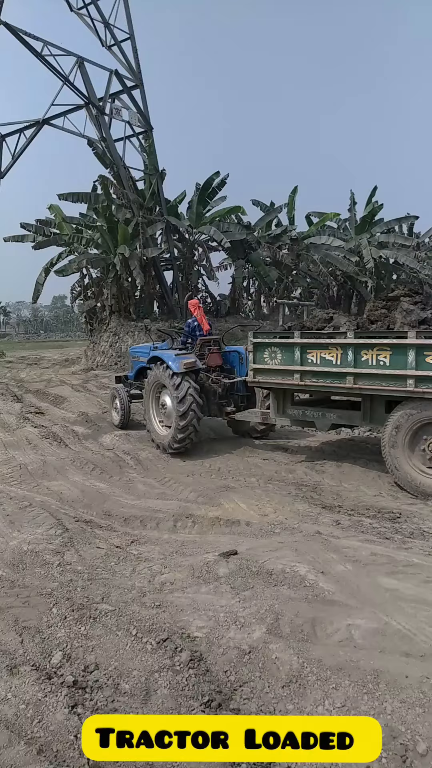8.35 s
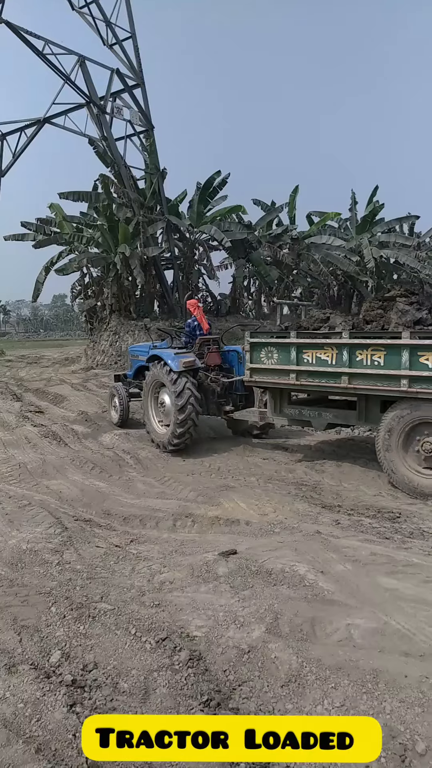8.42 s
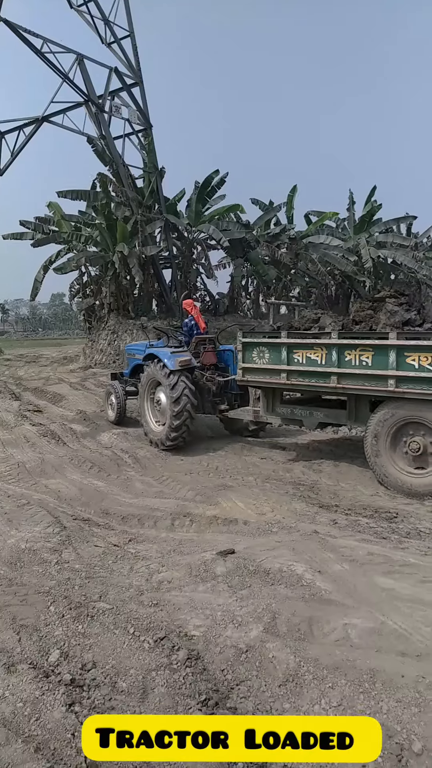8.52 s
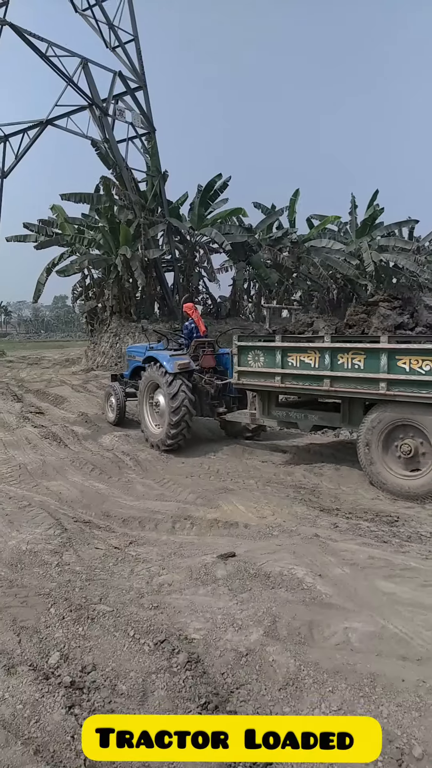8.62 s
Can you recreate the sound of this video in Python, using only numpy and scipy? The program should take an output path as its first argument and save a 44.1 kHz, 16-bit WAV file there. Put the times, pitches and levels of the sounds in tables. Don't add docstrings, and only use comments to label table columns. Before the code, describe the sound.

A loaded tractor starts loud: rough diesel chugging, exhaust bursts, stick-slip creaks from the trailer. Within three seconds the roar sinks into separate hard knocks and metallic rattles, then a pin scrapes and even ticks take over. Several quick bed blows and a broad lurch with steel squeals come around the middle. Afterwards faint ticking, low hum and soft settling thumps remain. Open field, phone microphones at a moderate distance.

```python
import sys
import numpy as np
from scipy import signal
from scipy.fft import rfft, irfft, dct, next_fast_len
from scipy.io import wavfile
from scipy.ndimage import uniform_filter1d, map_coordinates

SR = 44100
rng = np.random.default_rng(int(sys.argv[2]) if len(sys.argv) > 2 else 0)


def decibels_to_gain(level_db):
    exponent = np.asarray(level_db, float) / 20
    return 10 ** exponent


def output_pcm(signal):
    pcm = np.clip(np.atleast_2d(signal).T, -1, 1) * 32767
    wavfile.write(sys.argv[1], SR, np.round(pcm).astype(np.int16))


N = 382347
TIME = np.arange(N) / SR


def unit(x):
    return x / np.sqrt(np.mean(x ** 2) + 1e-20)


def along(points, hz):
    f, v = np.transpose(points)
    return np.interp(np.log(hz + 1), np.log(f + 1), v)


def curves(rows):
    s, *cols = np.transpose(rows)
    return [np.interp(TIME, s, c) for c in cols]


def wobble(rate_hz, size=N):
    knots = rng.standard_normal(int(size * rate_hz / SR) + 4)
    return map_coordinates(knots, [np.arange(size) * rate_hz / SR])


def filtered(x, response):
    m = next_fast_len(N + SR // 2)
    return irfft(rfft(x, m) * response(np.fft.rfftfreq(m, 1 / SR)), m)[..., :N]


def rush(spectrum, patchy_db, size=512):
    hz, _, z = signal.stft(rng.standard_normal((3, N)), SR, nperseg=size)
    field = uniform_filter1d(rng.standard_normal(z.shape[1:]), size=5, axis=0)
    field = uniform_filter1d(field, size=8, axis=1)
    gain = decibels_to_gain(patchy_db * unit(field) + along(spectrum, hz)[:, None])
    return unit(signal.istft(z * gain, nperseg=size)[1][:, :N])


def strikes(events, t60, rise):
    kicks, t = np.zeros(N), TIME[:SR // 4]
    kicks[[round(s * SR) for s, db in events]] = [decibels_to_gain(db) for s, db in events]
    return signal.fftconvolve(kicks, decibels_to_gain(-60 * t / t60) * (1 - np.exp(-t / rise)))[:N]


def rung(events, modes, gain_db, scatter_db, rise):
    out, t = np.zeros(N + SR), TIME[:SR // 4]
    for s, db in events:
        for hz, level_db, t60 in modes:
            luck, tune = rng.standard_normal(2)
            start_db = db + gain_db + level_db + scatter_db * luck
            fade = decibels_to_gain(start_db - 60 * t / t60) * (1 - np.exp(-t / rise))
            out[round(s * SR):][:len(t)] += fade * np.sin(2 * np.pi * hz * (1 + 0.011 * tune) * t)
    return out[:N]


def firings():
    # (time [s], rate [firings/s])
    speed = [(0.0, 24.91), (0.54, 20.17), (1.05, 20.28), (1.5, 15.72), (1.9, 18.43), (2.02, 13.44),
             (2.99, 18.87), (3.53, 18.9), (3.69, 17.68), (4.98, 18.56), (5.14, 15.5), (5.98, 19.37),
             (6.21, 17.13), (6.57, 20.63), (6.9, 17.72), (7.27, 20.26), (7.66, 18.01), (8.67, 19.23)]
    depth, hunt_hz, start_turns = 1.33, 2.079, .0788
    peak_s, span_s = 4.22, 1.1
    swell = np.exp(-.5 * ((TIME - peak_s) / span_s) ** 2)
    hunt = depth * swell * np.sin(2 * np.pi * (start_turns + hunt_hz * TIME))
    turns = np.cumsum(curves(speed)[0] + hunt) / SR - 1.02
    return np.interp(np.arange(int(turns[-1])), turns, TIME)


def valve_ticks(tick_db):
    # (time [s], peak [dB])
    knocks = [(0.1221, -25), (0.2079, -23), (0.534, -17), (0.5716, -17), (0.88, -22), (0.9287, -18),
              (1.4004, -16), (1.713, -20), (1.766, -14.5), (1.995, -19.5), (2.0832, -22), (2.4197, -16),
              (2.7617, -8), (2.8416, -20.5), (2.937, -19), (3.0927, -17), (3.4153, -19), (5.183, -25),
              (5.236, -14), (5.293, -14.5), (5.436, -37)]
    # (time [s], peak [dB])
    clear_ticks = [(3.4713, -30), (3.5167, -33), (3.5691, -26), (3.6244, -36), (3.6828, -31),
                   (3.7412, -33.5), (3.803, -26.5), (3.859, -26.5), (3.916, -22.5), (3.9682, -27),
                   (4.0195, -35), (4.0749, -32), (4.135, -26), (4.193, -26.5), (4.2485, -21.5),
                   (4.302, -24.5), (4.351, -30), (4.405, -31), (4.4575, -35), (4.5125, -34),
                   (4.5703, -28.5), (4.631, -27), (4.6885, -31), (4.7444, -25), (4.7998, -24),
                   (4.853, -23.5), (5.004, -30), (5.0632, -29.5), (5.126, -26.5),
                   (5.4957, -38), (5.5521, -32), (5.61, -33), (5.6683, -24.5), (5.7253, -25), (5.7831, -31),
                  (5.834, -29.5), (5.8838, -33), (5.9347, -45), (5.9886, -38), (6.041, -30.5),
                  (6.0959, -36), (6.1507, -41), (6.207, -37), (6.271, -35), (6.321, -35), (6.379, -31),
                  (6.4286, -22.5), (6.5768, -41), (6.6207, -38), (6.6795, -43), (6.7324, -44),
                  (6.7818, -43), (6.8367, -35.5), (6.8911, -34), (6.9459, -35), (7.0093, -32.5),
                  (7.056, -36), (7.1096, -43), (7.16, -34), (7.213, -38), (7.3183, -25), (7.4922, -44),
                  (7.568, -45), (7.6229, -42), (7.6783, -45), (7.7401, -58), (7.7945, -35.5), (7.8484, -39),
                  (7.9038, -42), (7.9536, -41), (7.9931, -46)]
    s = firings()
    db = np.interp(s, TIME, tick_db) + 3 * rng.standard_normal(len(s))
    over_hiss_db = 2.5
    clear = [*knocks, *[(at, peak + over_hiss_db) for at, peak in clear_ticks]]
    free = np.abs(s[:, None] - np.transpose(clear)[0]).min(axis=1) > .03
    return [*zip(s[free], db[free]), *clear]


def engine():
    # (time [s], level [dB], load: deepens rumble [dB], valve slack: sharpens ticks [dB])
    work = [(0.0, -24.5, -2.5, -5), (0.43, -29, 1.5, 5), (0.84, -28.5, 1, -4), (1.26, -28.5, 5, 2.5),
            (1.57, -35, 8, 9.5), (1.86, -30.5, -2, -23), (2.15, -40, 5.5, 10), (2.66, -37.5, 7.5, 8.5),
            (3.14, -41, 7, 8), (3.55, -42.5, 10.5, 24), (3.81, -45, 9, 17), (4.68, -46.5, 4.5, 25),
            (5.26, -42, 4.5, 12), (5.48, -44, 0.5, 16), (6.18, -44, 4, 10), (6.72, -47.5, -1, 17),
            (6.92, -45.5, 1, -2.5), (8.67, -46.5, -2, 11)]
    # (frequency [Hz], density [dB/Hz])
    thrum_spectrum = [(15, -76), (25, -54), (48, -31), (102, -1), (150, -1), (200, -2), (260, -5),
                      (440, -120)]
    # (frequency [Hz], density [dB/Hz])
    rumble_spectrum = [(100, -65), (170, -15.5), (275, -1), (312, -3.5), (359, -4.5), (420, -6), (466, -6),
                       (722, -13), (1000, -16), (1300, -27), (2200, -120)]
    # (frequency [Hz], density [dB/Hz])
    block_spectrum = [(350, -23.5), (600, -5), (805, -3), (1030, -10), (1350, 2.5), (1620, -3.5),
                      (2060, -4), (2390, -0.5), (2830, -7.5), (3110, -10.5), (3660, -14), (3800, -17.5),
                      (4940, -69), (8360, -120)]
    # (frequency [Hz], density [dB/Hz])
    clatter_spectrum = [(2060, -59), (3500, -10.5), (3680, -10), (3990, -1), (4290, -2), (6150, -9.5),
                        (6960, -7.5), (7780, -11), (8700, -9), (10300, -14), (12900, -19.5), (15400, -35)]
    block_db, load_db, slack_db = curves(work)
    rumble_db = block_db + load_db
    thrum_db = -23 + 0.59 * rumble_db
    clatter_db = -4 + 0.95 * block_db
    shared = wobble(12)

    thrum = decibels_to_gain(thrum_db + 2.5 + 1.46 * shared) * rush(thrum_spectrum, patchy_db=1, size=2048)

    tick_lag_s, chug_db = .022, 5
    beat = strikes([(max(s - tick_lag_s, 0), 0) for s in firings()], t60=0.093, rise=0.015)
    rumble_gain = decibels_to_gain(rumble_db - 2.0 + chug_db * beat + 1.06 * shared + 1.5 * wobble(30))
    rumble = rumble_gain * rush(rumble_spectrum, patchy_db=1.5, size=1024)

    early = [(max(s - .0015, 0), db) for s, db in valve_ticks(block_db + slack_db)]
    block_gain = decibels_to_gain(block_db + 1.4 * shared) + decibels_to_gain(-9.5) * strikes(early, t60=0.078, rise=0.007)
    block = block_gain * rush(block_spectrum, patchy_db=2.5)

    snap_db = 0
    ticks = strikes(early, t60=.075, rise=.0027) + decibels_to_gain(snap_db) * strikes(early, t60=.022, rise=.0015)
    clatter_gain = decibels_to_gain(clatter_db - 4.5 + 0.6 * shared) + decibels_to_gain(-11.5) * ticks
    clatter = clatter_gain * rush(clatter_spectrum, patchy_db=1.3)
    return thrum + rumble + block + clatter


def exhaust():
    # (time [s], pitch [Hz], level [dB])
    drone_track = [
        (0.0, 115.3, -44),
        (0.56, 103.9, -43.5),
        (1.44, 108, -36.5),
        (1.77, 114.7, -44),
        (2.3, 118.2, -50),
        (2.53, 119, -57),
        (2.7, 115, -49),
    ]
    # (time [s], peak [dB])
    puff_events = [(0.021, -18), (0.063, -21), (0.109, -20), (0.149, -17), (0.192, -25), (0.236, -19),
                   (0.278, -16), (0.322, -23), (0.37, -21), (0.416, -19), (0.465, -20), (0.501, -25),
                   (0.564, -19), (0.612, -22), (0.665, -21), (0.713, -19), (0.761, -21), (0.811, -22),
                   (0.861, -18), (0.911, -21), (0.959, -22), (1.006, -22)]
    # (frequency [Hz], level [dB], t60 [s])
    stack_modes = [(525, 0, .04), (590, -7, .03), (465, -9, .03)]
    hz, db = curves(drone_track)
    turn = 2 * np.pi * np.cumsum(hz + 1.86 * wobble(24.3)) / SR
    drone = decibels_to_gain(db + 9.0 + 1.4 * wobble(7.62)) * np.sin(turn)
    puffs = rung(puff_events, stack_modes, gain_db=8.5, scatter_db=.7, rise=.004)
    return drone * np.clip((2.7 - TIME) / .1, 0, 1) + puffs


def rubbing(rows, sag, overtone_db, flutter_db, flutter_rate, unsteady):
    out = np.zeros(N + SR)
    for s, length_s, start_hz, db in rows:
        n = round(length_s * SR)
        u = np.arange(n) / n
        hz = start_hz * (1 - sag * length_s * u) * (1 + unsteady * wobble(flutter_rate, size=n))
        turn = 2 * np.pi * np.cumsum(hz) / SR
        swell = np.clip(u / 0.085, 0, 1) * np.clip((1 - u) / 0.28, 0, 1)
        swell = swell * decibels_to_gain(db + flutter_db * wobble(flutter_rate, size=n))
        out[round(s * SR):][:n] += swell * (np.sin(turn) + decibels_to_gain(overtone_db) * np.sin(2 * turn))
    return out[:N]


def trailer():
    # (time [s], length [s], pitch [Hz], level [dB])
    groan_tones = [(.04, .15, 335, -30), (.2, .1, 352, -31), (.38, .13, 292, -29), (.52, .14, 286, -27.5),
                   (1.06, .13, 290.5, -25.5), (1.05, .22, 362, -30), (1.06, .13, 472, -33),
                   (1.18, .13, 265, -27.5), (2.49, .11, 255, -29), (1.34, .12, 470, -34),
                   (1.44, .14, 262, -31), (1.66, .22, 262.7, -33), (1.98, .1, 256, -33), (0, .16, 665, -32),
                   (.22, .1, 660, -36), (0, .07, 236, -31), (.3, .1, 372, -31), (1.34, .1, 365, -31),
                   (1.64, .21, 468, -32.5), (1.68, .12, 690, -43), (2.04, .12, 458, -35.5),
                   (2.1, .16, 216, -36)]
    # (time [s], length [s], pitch [Hz], level [dB])
    hum_tones = [
        (5.5, 2.72, 208, -51),
        (7.4, 0.92, 400, -58),
        (6.0, .5, 470, -60),
        (7.9, .77, 104, -59),
        (5.5, .8, 112, -65),
        (5.7, 1.1, 1500, -63),
        (7.2, 1.2, 1500, -63),
    ]
    # (time [s], length [s], pitch [Hz], level [dB])
    creak_tones = [
        (1.65, .216, 234, -31),
        (6.0, .12, 205, -45),
        (6.14, .12, 155, -43),
        (2.04, .16, 230, -33.5),
        (2.48, .11, 123.4, -33),
    ]
    # (time [s], length [s], pitch [Hz], level [dB])
    squeak_tones = [(.57, .04, 4600, -30), (.7, .06, 2250, -35), (.86, .04, 1400, -32),
                    (.97, .06, 1990, -28), (.98, .06, 2180, -27), (.98, .05, 2400, -27),
                    (1.73, .05, 1760, -33), (1.765, .04, 6700, -32), (1.83, .03, 1480, -32),
                    (2.937, .033, 2060, -23.5), (2.94, .03, 4100, -32), (2.94, .03, 6200, -38),
                    (3.013, .02, 3250, -25), (3.03, .025, 3280, -31), (3.09, .04, 6700, -36),
                    (5.194, .05, 2670, -26.5), (4.858, .025, 1560, -34), (5.197, .03, 5230, -26),
                    (5.213, .045, 5480, -30), (5.225, .035, 5120, -31), (5.235, .03, 5300, -29),
                    (5.262, .025, 5200, -33), (5.27, .025, 1470, -34), (5.288, .025, 1530, -26),
                    (5.305, .035, 580, -31), (5.3, .025, 3650, -32), (5.357, .02, 4480, -38),
                    (5.376, .042, 4410, -23.5)]
    # (time [s], peak [dB])
    bed_drops = [
        (4.858, -7.5),
        (4.867, -16),
        (4.878, -5.5),
        (4.897, -11),
        (4.919, -12),
        (4.947, -12),
        (4.979, -17),
        (5.003, -27),
    ]
    # (frequency [Hz], level [dB], t60 [s])
    bed_modes = [(155, -8.5, 0.067), (231, -4.5, 0.058), (329.6, 2, 0.05), (371, 5.5, 0.047),
                 (453, -4, 0.037)]
    # (time [s], peak [dB])
    pin_slips = [
        (3.3424, -14),
        (3.3505, -10),
        (3.358, -10),
        (3.3729, -6),
        (3.3775, -12),
        (3.385, -14),
        (3.3974, -11.5),
        (3.404, -10.5),
        (3.412, -15),
    ]
    # (frequency [Hz], level [dB], t60 [s])
    pin_modes = [(340, -5, .06), (650, -6, .05), (1095, -1, .035), (1345, -1, .045), (1580, -4, .03),
                 (1800, -5, .03), (2000, -6, .03), (2230, 0, .04), (2430, -2, .035), (2700, -9, .03)]
    groans = rubbing(groan_tones, .13, overtone_db=-15, flutter_db=2.5, flutter_rate=36, unsteady=0.01)
    groans += rubbing(hum_tones, 0, overtone_db=-20, flutter_db=2.5, flutter_rate=9, unsteady=0.004)
    groans += rubbing(creak_tones, .22, overtone_db=-11, flutter_db=2.5, flutter_rate=28.6, unsteady=0.007)
    squeaks = rubbing(squeak_tones, .02, overtone_db=-24, flutter_db=2, flutter_rate=300, unsteady=.015)
    drops = rung(bed_drops, bed_modes, gain_db=-2.5, scatter_db=1.2, rise=0.008)
    scraping = rung(pin_slips, pin_modes, gain_db=-7.5, scatter_db=1.8, rise=0.0027)
    return decibels_to_gain(-0.5) * groans + squeaks + drops + scraping


def jolts():
    # (time [s], level [dB], centre [Hz], t60 [s])
    heaves = [
        (2.08, -23, 1000, 0.47),
        (2.68, -43, 327, 0.16),
        (3.15, -37.5, 400, .15),
        (5.24, -6, 343, 0.33),
        (5.999, -14.5, 253, 0.29),
        (6.849, -12, 336, 0.26),
    ]
    # (time [s], level [dB], centre [Hz], t60 [s])
    thuds = [(2.34, -26, 400, 1), (2.49, -17.5, 280, 0.21), (2.515, -16, 402, 0.23), (2.85, -27, 310, 0.7),
             (3.012, -21, 900, 0.29), (3.091, -16.5, 484, 0.09), (3.43, -17, 297, 0.13),
             (3.584, -19.5, 810, 0.2), (4.19, -27, 430, 0.35), (4.28, -32.5, 296, 0.36),
             (4.6, -36.5, 495, 1), (4.749, -32.5, 1300, 1), (4.85, -24.5, 1110, 0.39),
             (5.255, -22.5, 1390, 0.36), (5.3, -22.5, 330, 0.13), (5.38, -27, 398, 0.12),
             (5.655, -24.5, 420, 0.22), (6.17, -43, 199, 0.56), (6.38, -34, 1960, 0.7),
             (8.36, -38, 302, 0.45)]
    # (time [s], level [dB], centre [Hz], t60 [s])
    clanks = [(.985, -19, 2000, 0.12), (2.343, -29, 2490, 0.088), (2.42, -30, 6200, 0.24),
              (2.721, -43, 4470, 0.068), (2.758, -20, 6490, 0.092), (2.765, -20, 6000, 0.08),
              (2.775, -17, 5800, 0.068), (2.76, -24.5, 1470, 0.41), (3.341, -24.5, 1370, 0.45),
              (3.416, -32.5, 5900, 0.27), (4.853, -24.5, 5040, 0.32), (4.895, -30, 4800, 0.15),
              (5.222, -31, 6860, 0.049), (5.295, -20, 1590, 0.17), (6.378, -40, 5060, 0.54),
              (6.43, -50, 5160, 0.24), (7.0, -48, 4560, 0.067), (7.221, -38.5, 4600, 0.15),
              (7.308, -39, 4660, 0.28)]
    # (time [s], level [dB], centre [Hz], t60 [s])
    scrapes = [
        (3.33, -33, 2230, 0.13),
        (3.345, -24, 2200, 0.37),
        (3.396, -22, 2370, 0.13),
        (3.53, -33, 2010, 0.084),
        (3.587, -22, 2650, 0.12),
        (4.755, -29, 2340, 0.14),
        (5.27, -23.5, 1460, 0.29),
        (5.3, -25.5, 596, 0.28),
        (.24, -29.5, 1026, 0.97),
        (8.53, -47, 940, 0.18),
    ]
    # (table, width [octaves], rise [s])
    kinds = [(heaves, 2.1, 0.21), (thuds, 3.76, 0.012), (clanks, 1.8, 0.0023), (scrapes, 0.22, 0.0017)]
    low_cut_hz = 85
    out, t = np.zeros((3, N + SR)), TIME[:SR // 2]
    hz = np.fft.rfftfreq(len(t), 1 / SR) + 1
    for rows, width, rise in kinds:
        for s, db, centre_hz, t60 in rows:
            band = decibels_to_gain(-24 * (np.log2(hz / centre_hz) / width) ** 2) / (1 + (low_cut_hz / hz) ** 4)
            noise = unit(irfft(rfft(rng.standard_normal((3, len(t)))) * band, len(t)))
            rattle_db = 2.2 * wobble(52, size=len(t))
            fade = decibels_to_gain(db - 1 + rattle_db - 60 * t / t60) * (1 - np.exp(-t / rise))
            start = round(s * SR)
            out[:, start:start + len(t)] += fade * noise
    return out[:, :N]


def scattered(x):
    t = TIME[:SR // 10]
    tails = rng.standard_normal((2, len(t))) * decibels_to_gain(-60 * t / 0.049)
    return signal.fftconvolve(x[None], tails / np.linalg.norm(tails[0]), axes=1)[:, :N]


def ports(x, clear):
    # (frequency [Hz], phase [rad])
    lead_points = [(0, 0), (430, 0.28), (1030, -1.29), (3790, -3.5), (8100, -10), (15000, -30.5)]
    # (frequency [Hz], level [dB])
    lean_points = [(60, -0.5), (110, -0.5), (200, 0), (380, 2.5), (700, 0.5), (1290, 1), (2370, 3),
                   (4380, -3.5), (8080, -1), (14900, 8)]
    # (frequency [Hz], level [dB])
    diffuse_points = [(30, -8), (70, -19), (130, -8.5), (250, -9.5), (600, 5), (1200, 1.5), (2500, -2.5),
                      (5000, 1), (9000, 16.5)]

    def lean(hz):
        return decibels_to_gain(np.outer([.5, -.5], along(lean_points, hz)))

    def lead(hz):
        radians = np.interp(hz, *np.transpose(lead_points))
        return lean(hz) * np.exp(1j * np.outer([.5, -.5], radians))

    def own(hz):
        return decibels_to_gain(along(diffuse_points, hz))

    shared = filtered(x[0], lambda hz: 1 / np.sqrt(1 + own(hz) ** 2)) + clear
    diffuse = filtered(x[1:], lambda hz: lean(hz) * own(hz) / np.sqrt(1 + own(hz) ** 2))
    return filtered(shared, lead) + diffuse


def scene():
    clear = decibels_to_gain(-3.0) * exhaust() + decibels_to_gain(1.5) * trailer()
    echoes = np.vstack([np.zeros(N), scattered(clear)])
    noisy = engine() + jolts() + decibels_to_gain(-7) * echoes
    return ports(noisy, clear) * decibels_to_gain(2.0)


def thinned(x):
    # (frequency [Hz], level re median mid-band line [dB])
    band_floor = [(2750, -30), (2760, -8), (3090, -3), (3110, 0), (3440, 0), (3460, 2), (3780, 2),
                  (3800, -40), (7900, -40), (7930, -5.5), (9290, -8), (9320, -45)]
    # (frequency [Hz], level re median mid-band line [dB])
    line_floor = [(6000, -40), (7700, -10), (8200, -8.5), (10000, -9), (13000, -15), (14600, -21),
                  (15200, -15), (15500, 20)]
    size, width, offset = 1024, 8, 1480
    drift_db, quiet_starves = 2.5, .2
    count = N // size + 3

    window = np.sin(np.pi * (np.arange(2 * size) + .5) / (2 * size))
    padding = ((0, 0), (offset, (count + 1) * size - N - offset))
    blocks = np.pad([x[0] + x[1], x[0] - x[1]], padding).reshape(2, -1, size)
    frames = np.dstack([blocks[:, :-1], blocks[:, 1:]]) * window
    a, b, c, d = np.split(frames, 4, axis=2)
    lines = dct(np.dstack([-c[..., ::-1] - d, a - b[..., ::-1]]), type=4, norm="ortho")
    hz = (np.arange(size) + .5) * SR / (2 * size)
    power = lines ** 2

    loud = 1e-12 + np.median(power[..., (hz > 2000) & (hz < 7500)], axis=2, keepdims=True)
    drift = unit(uniform_filter1d(rng.standard_normal((count, size // width)), size=3, axis=0))
    bands = uniform_filter1d(power.reshape(2, count, -1, width).mean(axis=3), size=2, axis=1)
    bands = np.repeat(bands * decibels_to_gain(drift_db * drift) ** 2, width, axis=2)
    sunk = (np.median(loud) / loud) ** (quiet_starves * (hz < 4000))
    band_kept = bands > loud * sunk * decibels_to_gain(along(band_floor, hz)) ** 2
    line_kept = power > loud * decibels_to_gain(along(line_floor, hz)) ** 2

    u, v = np.split(dct(lines * (band_kept & line_kept), type=4, norm="ortho"), 2, axis=2)
    frames = np.dstack([v, -v[..., ::-1], -u[..., ::-1], -u]) * window
    head, tail = np.split(frames, 2, axis=2)
    joined = (head[:, 1:] + tail[:, :-1]).reshape(2, -1)
    mid, side = joined[:, offset - size:][:, :N] / 2
    return np.array([mid + side, mid - side])


def top_cut(x):
    return signal.sosfilt(signal.butter(12, 15520, fs=SR, output="sos"), x)


def record(dry):
    def step(hz):
        return decibels_to_gain(-11.5 * np.clip((hz - 7900) / 150, 0, 1))

    return top_cut(thinned(filtered(dry, step)))


dry = scene()
out = record(dry)
output_pcm(out)
```